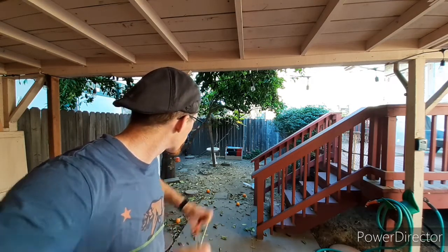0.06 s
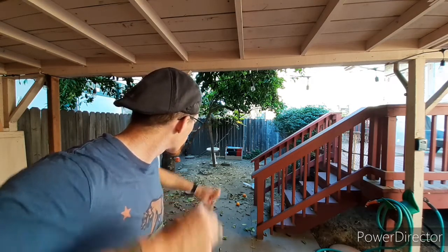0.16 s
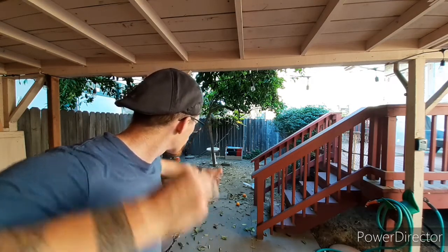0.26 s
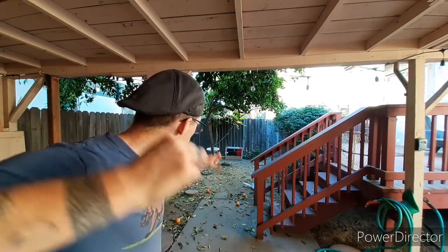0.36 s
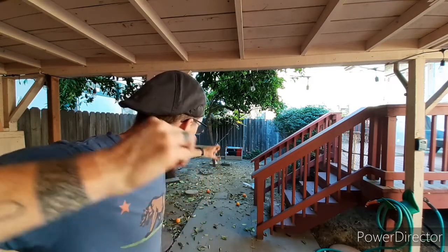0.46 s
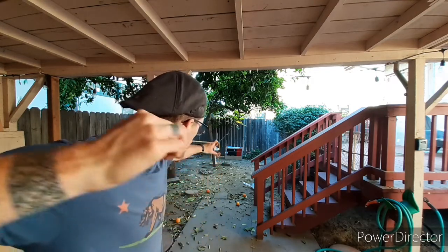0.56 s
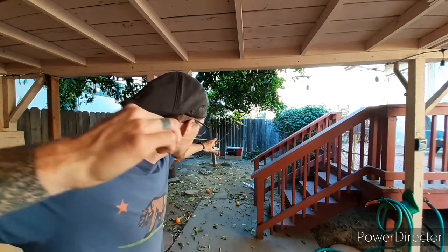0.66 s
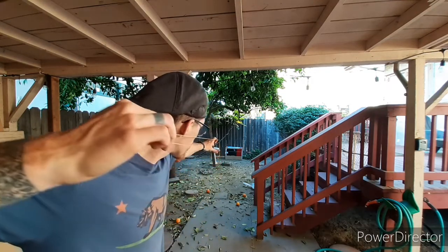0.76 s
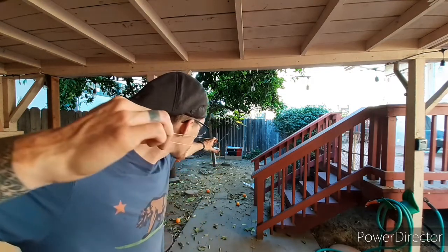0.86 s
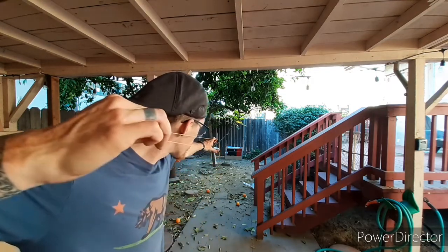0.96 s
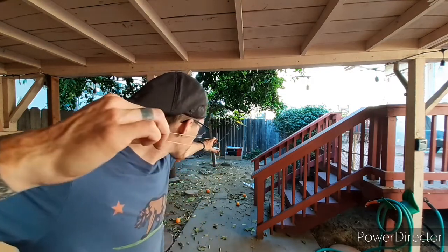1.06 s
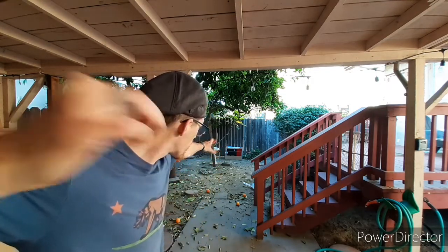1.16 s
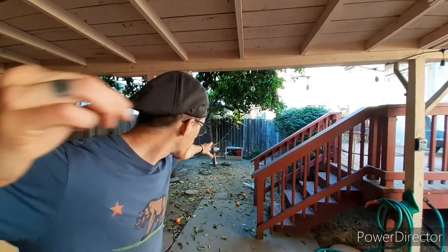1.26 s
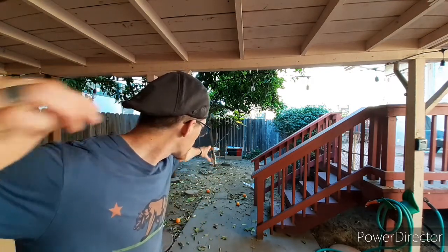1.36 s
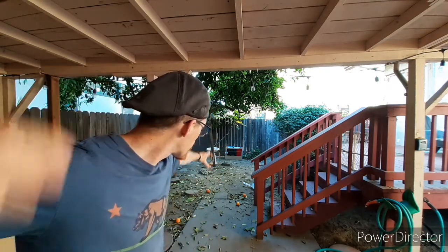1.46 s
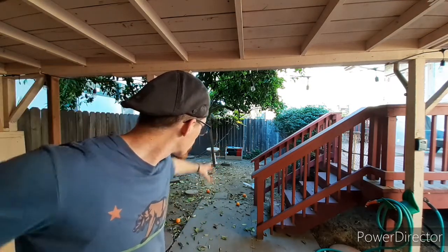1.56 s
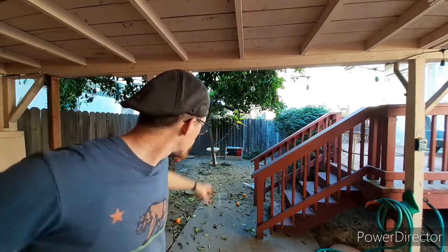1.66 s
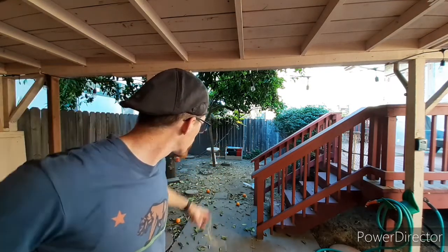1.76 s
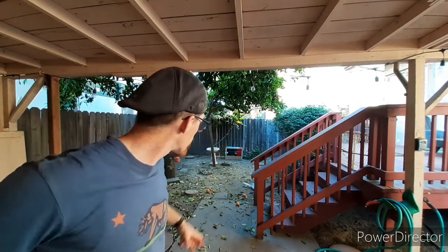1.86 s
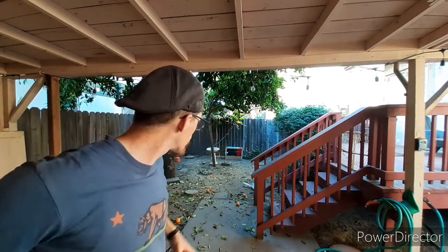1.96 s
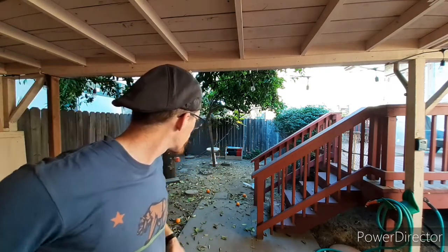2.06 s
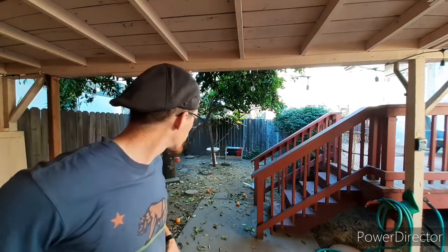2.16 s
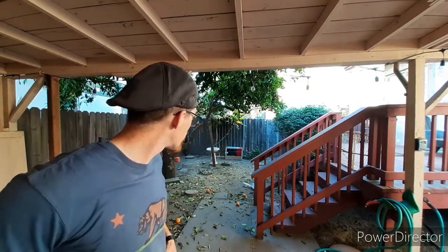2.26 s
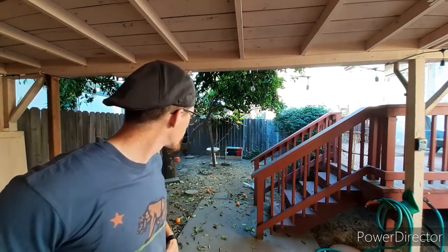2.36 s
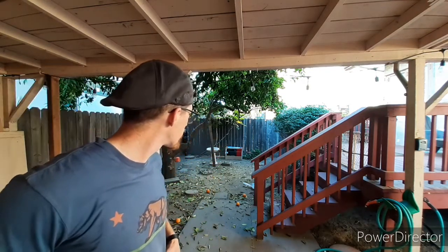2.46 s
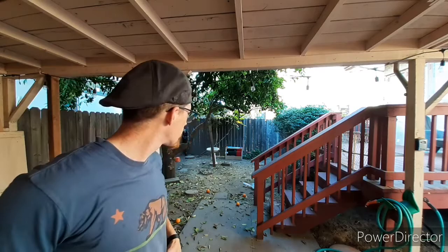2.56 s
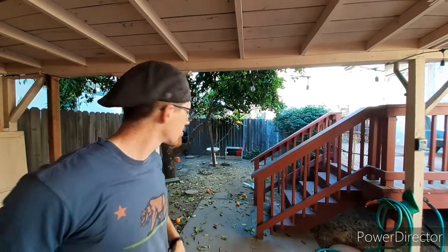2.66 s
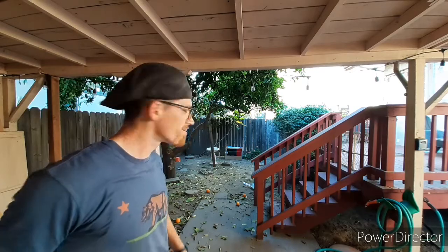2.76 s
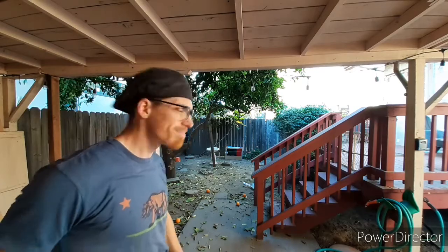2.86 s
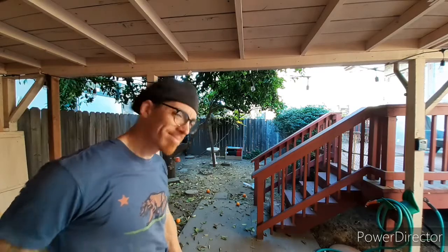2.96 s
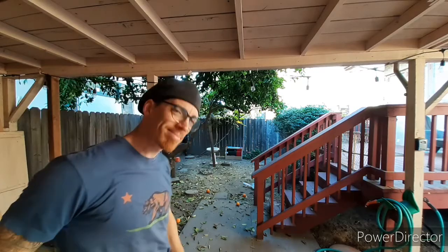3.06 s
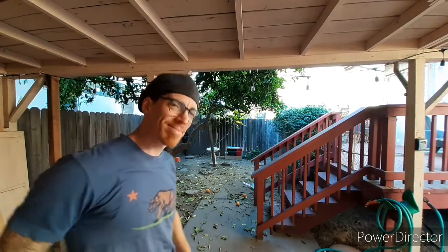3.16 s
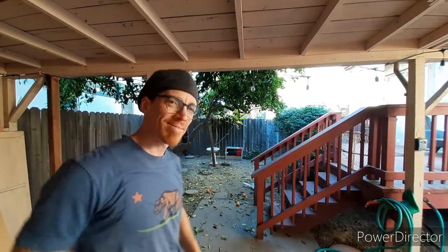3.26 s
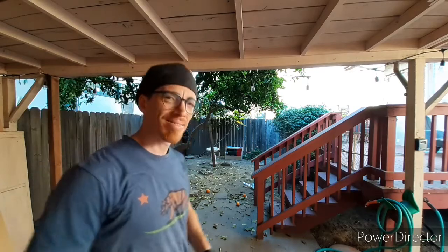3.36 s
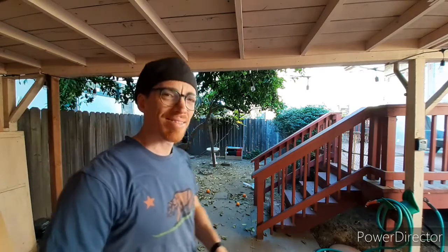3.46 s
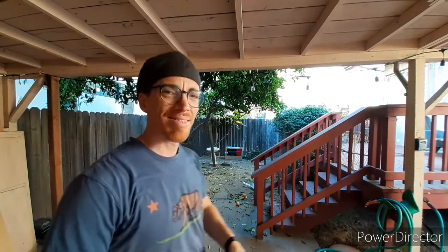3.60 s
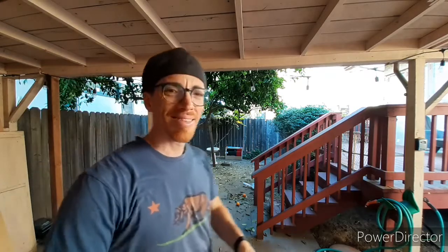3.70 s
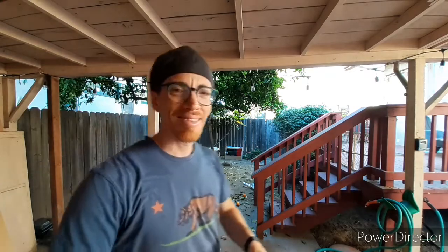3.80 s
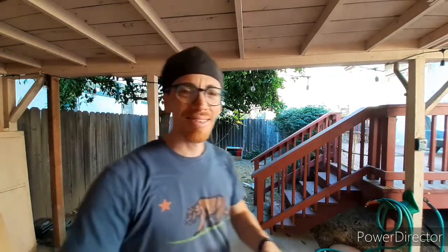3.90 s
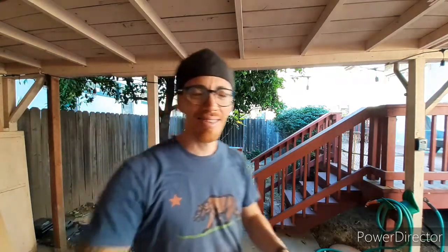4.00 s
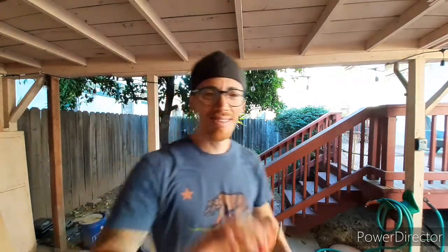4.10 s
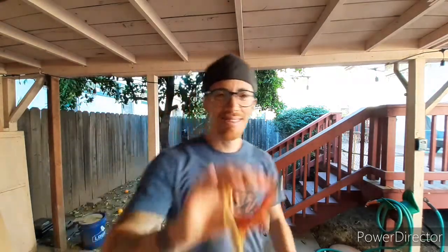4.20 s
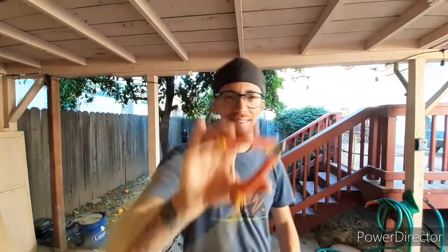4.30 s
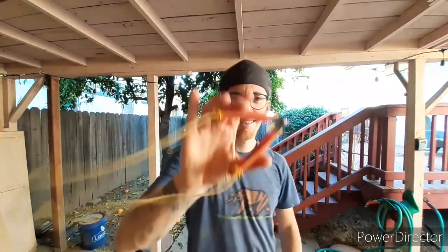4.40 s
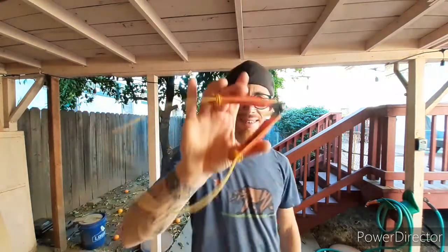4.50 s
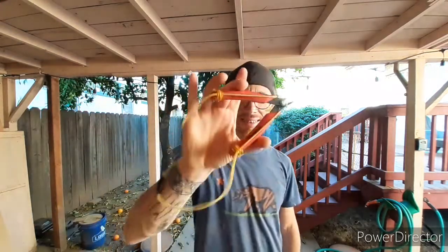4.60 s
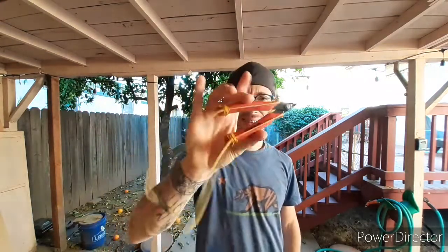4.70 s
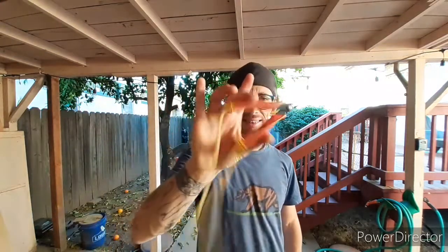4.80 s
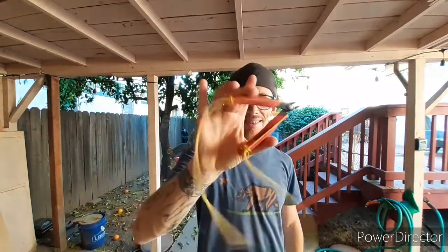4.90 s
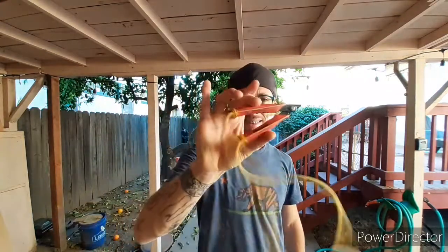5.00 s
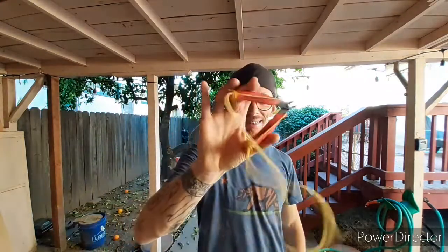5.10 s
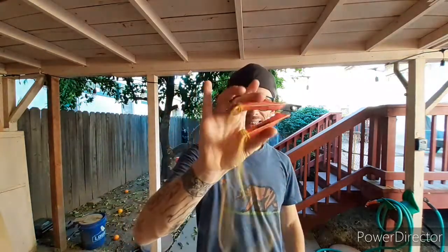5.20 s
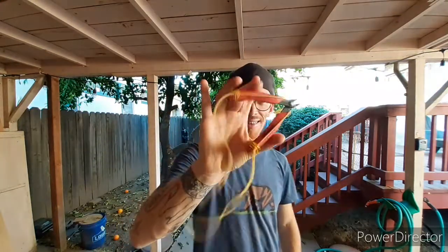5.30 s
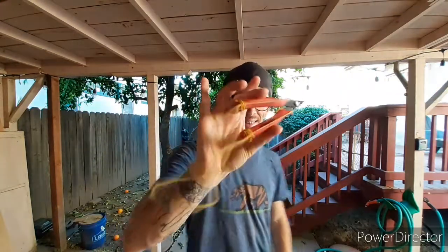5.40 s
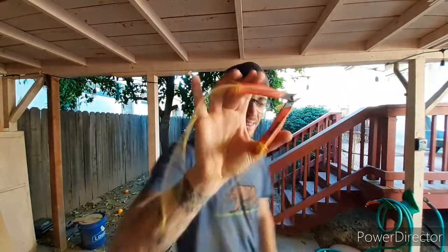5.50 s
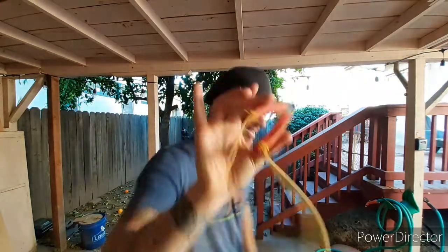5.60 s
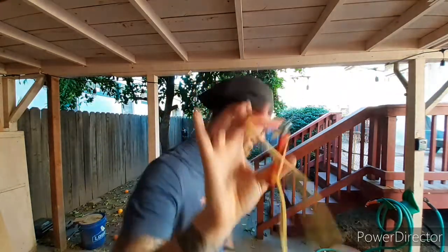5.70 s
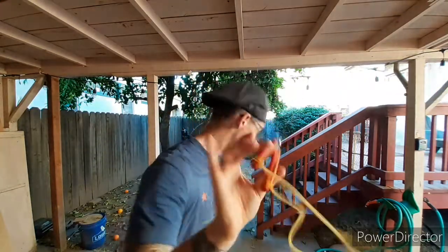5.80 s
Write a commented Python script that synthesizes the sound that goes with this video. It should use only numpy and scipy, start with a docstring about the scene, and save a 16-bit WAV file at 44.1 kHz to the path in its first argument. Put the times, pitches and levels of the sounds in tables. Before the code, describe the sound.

Under a wooden porch roof, low distant traffic and a faint motor hum precede a quick rubber-band whip and bright slaps close by. Almost at once the shot cracks loudly on a hollow bin down the yard, the sound washing back from fences. Several duller bounces follow, then soft cloth and shoe rustles and small ticks near a stereo microphone.

```python
"""Distant traffic and a machine's hum: drifting shaped noise and wavering sine orders.
Under a wooden porch roof a small slingshot whips and flaps: grainy noise and short slaps, with sparse echoes.
The shot cracks on a hollow bin down the yard and bounces a few times: noise bursts, decaying modes, and
noise washing back off fences and walls. Then cloth and soles rustle nearby: noise strokes, thuds and a squeak."""
import sys
import numpy as np
from scipy import signal
from scipy.io import wavfile
from scipy.ndimage import uniform_filter1d

SR = 44100
rng = np.random.default_rng(int(sys.argv[2]) if len(sys.argv) > 2 else 0)


def digitize_waveform(pressure):
    """Quantize a signal to 16-bit integers and store it at the path in sys.argv[1].

    Rows of a 2-D input are taken as channels; values are limited to [-1, 1].
    """
    field = np.atleast_2d(pressure).T
    bounded = np.clip(field, -1, 1)
    quanta = np.round(bounded * 32767).astype(np.int16)
    wavfile.write(sys.argv[1], SR, quanta)


def how_loud(loudness_db):
    """Turn decibels into a plain amplitude multiplier (0 dB gives 1, 20 dB gives 10)."""
    steps = np.asarray(loudness_db, float) / 20
    return 10 ** steps


N = 257940  # samples


def evened(x):
    """Scales to rms 1."""
    return x / np.sqrt(np.mean(x ** 2) + 1e-20)


def read(points, hz):
    """Looks up a table on a log-frequency axis."""
    f, value = np.transpose(points)
    return np.interp(np.log(hz + 1), np.log(f + 1), value)


def add(mix, start_s, sound):
    """Mixes a stereo sound in at start_s, cut at the end of the mix."""
    part = mix[:, round(start_s * SR):][:, :sound.shape[1]]
    part += sound[:, :part.shape[1]]


# sound from all around: (frequency [Hz], left-right likeness [0-1])
AROUND_LIKENESS = [(60, .97), (200, .96), (310, .86), (450, .5), (650, .14), (1400, .02), (15000, .02)]


def diffuse(count, size, shape_db, patchy_db, likeness=AROUND_LIKENESS, ripple_db=0):
    """Stereo noise from random short-time spectra; shape_db(hz, t) gives the level of every cell."""
    frames, hz = 4 * count // size + 5, np.fft.rfftfreq(size, 1 / SR)[:, None]
    a, b, c, d, patches = rng.standard_normal((frames, len(hz), 5)).T
    ripple = patches[:, :1]  # narrow peaks that stay put, as many small resonances give
    patches = uniform_filter1d(patches, size=8, axis=0)
    patches = evened(uniform_filter1d(patches, size=8, axis=1))
    same = np.clip(read(likeness, hz), -1, 1)
    left = a + 1j * b
    right = same * left + np.sqrt(1 - same ** 2) * (c + 1j * d)
    level_db = shape_db(hz, np.arange(frames) * size / 4 / SR) + patchy_db * patches + ripple_db * ripple
    cells = np.array([left, right]) * how_loud(level_db)
    return signal.istft(cells, nperseg=size, noverlap=3 * size // 4)[1][:, :count]


def humps(modes, hz):
    """Level in dB of a set of resonances, summed in power."""
    return 10 * np.log10(sum(how_loud(2 * db) / (1 + (2 * (hz - f) / width) ** 4) for f, width, db in modes))


def grainy(x, spread_db):
    """Many tiny slips of uneven size roughen a noise; rms 1."""
    slips = how_loud(spread_db * np.minimum(rng.exponential(1, x.shape[1]), 5))
    return evened(x * uniform_filter1d(slips, size=24))


def stroke(rise_s, hold_s, swell, fade_db_per_s):
    """Gain of one gesture: swells as a power of time, holds, then dies exponentially."""
    t = np.arange(0, rise_s + hold_s + 50 / fade_db_per_s, 1 / SR)  # until 50 dB down
    return np.minimum(t / rise_s, 1) ** swell * how_loud(-fade_db_per_s * np.maximum(t - rise_s - hold_s, 0))


def echoes(x, t60_s, level_db):
    """Adds sparse reflections of random sign off roof, posts and floor."""
    count = SR // 2
    taps = np.zeros((2, count))
    slots = np.arange(100, count - 20, 20)
    at = slots + rng.integers(0, 20, (2, len(slots)))
    np.put_along_axis(taps, at, rng.choice([-1., 1.], at.shape), axis=1)
    taps *= how_loud(-60 * np.arange(count) / SR / t60_s)
    reflected = signal.oaconvolve(x, taps / np.linalg.norm(taps[0]), axes=1)[:, :N]
    return x + how_loud(level_db) * reflected


def snaps(rows, spread):
    """Short decaying noise bursts; band edges lie a factor of spread either side of the centre."""
    out, t = np.zeros((2, N)), np.arange(200) / SR
    for start_s, peak_db, hz, pan_db in rows:
        band = signal.butter(2, [hz / spread, min(spread * hz, 20000)], "bandpass", fs=SR)
        snap = signal.lfilter(*band, rng.standard_normal((2, len(t))))
        snap *= np.exp(-t / (.0006 + 2 / hz))
        pan = how_loud([[pan_db / 2], [-pan_db / 2]])
        add(out, start_s, how_loud(peak_db) * pan * snap / abs(snap).max())
    return out


# air rush of the released bands: (frequency [Hz], density [dB per Hz])
WHIP_COLOUR = [(59, -41), (100, -2.5), (676, -8.5), (768, -4.5), (950, -9.5), (1200, -4), (1800, -6),
               (3940, -5), (7450, -18), (8280, -5), (13200, -4.5), (16000, -15)]
WHIP_START_S, WHIP_RISE_S, WHIP_HOLD_S, WHIP_DB = 1.2129, 0.0314, 0.0467, -22.5
WHIP_SWELL, WHIP_FADE_DB_PER_S = 2.7, 519.5
# slaps of bands and pouch: (time [s], peak before pan [dB], centre [Hz], left-right [dB])
SLAPS = [(1.2177, -25.5, 13000, 0), (1.2266, -25, 1002, 3.5), (1.2394, -8, 5000, -2.5),
         (1.2445, -16, 12010, 0), (1.2665, -14, 11030, 0.5), (1.273, -10.5, 6000, -0.5),
         (1.291, -17.5, 8000, -3)]
# small ticks of the tool in the hand: (time [s], peak before pan [dB], centre [Hz], left-right [dB])
TICKS = [(2.4, -48, 12000, 3), (2.443, -45, 11360, -3), (2.831, -59.5, 9000, 10), (2.853, -62, 11000, 5),
         (3.4498, -52, 8960, 7.0), (5.0394, -57.5, 8450, 5.5), (5.115, -62, 9500, 3), (5.255, -60, 8650, 4),
         (5.3083, -57, 8550, 3), (5.459, -53, 9300, 2.0), (5.6507, -36, 8700, 1), (5.816, -42, 8800, 1.5),
         (5.8414, -37, 10000, -1.5)]


def slingshot():
    """Rubber rushing through air as grainy noise, slaps and ticks of loose parts, all echoed by the porch."""
    speed = stroke(WHIP_RISE_S, WHIP_HOLD_S, WHIP_SWELL, WHIP_FADE_DB_PER_S)
    rush = diffuse(len(speed), size=512, shape_db=lambda hz, t: read(WHIP_COLOUR, hz), patchy_db=0.5)
    out = snaps(SLAPS, spread=2.2) + snaps(TICKS, spread=1.2)
    add(out, WHIP_START_S, how_loud(WHIP_DB) * speed * grainy(rush, 6.5))
    return echoes(out, t60_s=0.4, level_db=-7.0)


# fast blow: (frequency [Hz], density [dB per Hz])
HARD = [(70, -44), (120, -23), (185, -10.5), (320, -17), (700, -17.5), (1040, -4), (1300, -6), (1950, -3),
        (2600, -6), (3400, -3.5), (4100, -1.5), (4800, -8.5), (6400, -9.5), (9000, -8.5), (13000, -10.5),
        (16000, -18.5)]
# slow blow: (frequency [Hz], density [dB per Hz])
SOFT = [(71, -36.5), (120, -15), (569, -6.5), (656, -10.5), (1010, -1), (1290, -7.5), (1620, 2.5),
        (7050, -12), (9990, -9.5), (14700, -16), (16000, -46)]
# sound from down the yard: (frequency [Hz], left-right likeness [0-1])
YARD_LIKENESS = [(60, .95), (200, .95), (330, .85), (640, .45), (1400, .16), (3100, .08), (15000, .15)]
CRACK_OVER_DB, CRACK_DULLED_DB = 19.5, -15  # peak over the wash level; change at full dullness


def crack(wash_db, dull, colour):
    """The direct blow: a very short noise burst that keeps its treble."""
    t = np.arange(300) / SR
    brighter = lambda hz, u: colour(hz) + 1.5 * np.log2(hz + 100)
    burst = diffuse(len(t), size=256, shape_db=brighter, patchy_db=2.0, likeness=YARD_LIKENESS)
    burst *= np.exp(-(t / .0027) ** 3)
    return how_loud(wash_db + CRACK_OVER_DB + CRACK_DULLED_DB * dull) * burst / abs(burst).max()


# yard decay for a sharp blow: (frequency [Hz], t60 [s])
YARD = [(150, 0.53), (400, .5), (1000, 0.4), (2000, 0.36), (2900, 0.41), (4000, 0.43), (5200, 0.35),
        (8500, 0.37), (14000, 0.28)]
# wooden body: (frequency [Hz], width [Hz], level [dB])
WOOD = [(295.2, 210, -3.5), (570, 130, -1.5), (750, 52, 1), (1150, 300, -3)]
BUILD_MS, WOOD_BUILD_MS = 1.2, 13  # time constants of the fill-in
LAZY_MS_PER_DB, FIRM_DB = 0.33, -32  # blows weaker than a firm one fill in more slowly
DULL_SHORTER = 0.34  # share of the decay time that a fully dull blow loses
LINGER_DB, LINGER_DULL_DB, LINGER_LONGER = -31, 12, 2.6  # slower tail: level, rise at full dullness, t60 factor


def yard_wash(t, wash_db, dull, wood_db, colour):
    """Noise sent back by the yard: fills in, holds, then dies by band, with a slower tail and a wooden body."""
    near_db = lambda hz, u: -60 * (np.hypot(u, .04) - .04) / read(YARD, hz)  # holds before it falls

    def fall_db(hz, u):
        """Power sum of the main decay and the slower tail."""
        main_db = near_db(hz, u) / (1 - DULL_SHORTER * dull)
        tail_db = LINGER_DB + LINGER_DULL_DB * dull + near_db(hz, u) / LINGER_LONGER
        return 10 * np.log10(how_loud(2 * main_db) + how_loud(2 * tail_db))

    build_ms = BUILD_MS + LAZY_MS_PER_DB * max(FIRM_DB - wash_db, 0)
    wood = lambda hz: humps(WOOD, hz)
    wash = 0
    for level_db, tone, ms in ((wash_db, colour, build_ms), (wood_db, wood, WOOD_BUILD_MS)):
        dying = lambda hz, u: tone(hz) + fall_db(hz, u)
        part = diffuse(len(t), size=1024, shape_db=dying, patchy_db=1.8, likeness=YARD_LIKENESS, ripple_db=1.8)
        rise = 1 - np.exp(-1000 * t / ms)
        wash = wash + how_loud(level_db) * rise * part / np.std(part[:, :1500])
    single = grainy(np.ones((1, len(t))), 1.8)  # early on, single reflections stand out
    return wash * (1 + (single - 1) * np.exp(-t / .06))


# bin modes for a sharp blow: (frequency [Hz], level [dB], t60 [s])
BIN = [(183.7, -1, 0.69), (199.7, -10, 0.91), (1034, -1.5, 0.31), (1120, -20, 0.71), (1290, -10, .3),
       (1561, -6.5, 0.083), (1950, -9.5, .23), (3400, -8, .35), (3690, -7.5, 0.49), (4100, -13, 0.33),
       (4320, -13, 0.3)]


def bin_ring(t, dull, ring_db):
    """Decaying modes of the hollow bin; slow blows hardly wake the high ones and are damped sooner."""
    ring = 0
    for hz, db, t60_s in BIN:
        dulled_db = 2.6 * dull * np.log2(hz / BIN[0][0])
        fall_db = 60 * t / t60_s / (1 - .75 * dull)
        # high modes reach the two ports with unrelated phase, low ones nearly together
        turns = hz * t + hz / 1000 * rng.random((2, 1))
        ring = ring + how_loud(db - dulled_db - fall_db) * np.sin(2 * np.pi * turns)
    return how_loud(ring_db) * ring * (1 - np.exp(-t / 0.0046))


# shot striking and bouncing: (time [s], wash [dB], dullness [0-1], wooden body [dB], bin ring [dB])
KNOCKS = [(1.3524, -17, 0.02, -43, -28), (1.6855, -40.5, 0.77, -43, -36.5), (1.771, -32, 1, -36.5, -51),
          (2.0359, -49, 0.99, -46.5, -36.5), (2.0939, -36.5, 1, -44, -57),
          (2.1157, -31.5, 0.53, -31, -32.5), (2.452, -66, 0.55, -54, -58)]


def knocks():
    """Each impact joins a short crack, the ringing bin and the yard's wash; dull blows take the soft spectrum."""
    out, t = np.zeros((2, N)), np.arange(0, .75, 1 / SR)
    for start_s, wash_db, dull, wood_db, ring_db in KNOCKS:
        colour = lambda hz: (1 - dull) * read(HARD, hz) + dull * read(SOFT, hz)
        knock = yard_wash(t, wash_db, dull, wood_db, colour) + bin_ring(t, dull, ring_db)
        add(knock, 0, crack(wash_db, dull, colour))
        add(out, start_s, knock)
    return out


# treble of rubbing: (frequency [Hz], density [dB per Hz])
RUB = [(3820, -15), (6500, -10), (7610, -8.5), (8430, -1.5), (9690, -5.5), (11400, -5.5), (15000, -12.5),
       (15600, -19), (16000, -53)]
# middle resonances: (frequency [Hz], width [Hz], level [dB])
RUB_BODY = [(880, 1800, 4), (1700, 370, 6), (2880, 1840, 6), (5440, 2100, -3.5)]
# one row a stroke: (start [s], rise [s], hold [s], treble [dB], middle against treble [dB])
RUBS = [(2.201, 0.056, 0.16, -64.5, -2), (2.438, 0.028, 0.041, -72, 14), (2.729, .08, .02, -81, 2),
        (2.822, .012, .04, -72.5, -4), (2.859, 0.079, 0.18, -64.5, 4.5), (3.091, .088, 0.017, -47.5, -1.5),
        (3.181, 0.036, 0.062, -53, 3.5), (3.228, 0.076, 0.014, -56, 11), (3.4, .08, .25, -72, 1.5),
        (3.439, 0.011, 0.029, -69.5, -1.5), (3.7, 0.082, 0.24, -83, -2), (4.016, .045, .01, -50, 7.5),
        (4.199, 0.12, .06, -59.5, 7), (4.391, .135, 0.0047, -55, 4.5), (4.6, .08, 0.39, -85, 0),
        (5.03, .012, .2, -82, 5), (5.269, 0.042, .02, -70, 2), (5.303, 0.032, 0.1, -69, 7),
        (5.4, 0.075, 0.062, -63.5, 2.5), (5.529, 0.053, .03, -65, 1), (5.599, 0.033, .01, -61, 5.5),
        (5.66, .02, .18, -71, 7)]
RUB_SWELL, RUB_FADE_DB_PER_S = 1.55, 195


def rubs():
    """Cloth and soles: rubbing surfaces give a grainy hiss and a lower resonant scrape."""
    out = np.zeros((2, N))
    for start_s, rise_s, hold_s, treble_db, middle_db in RUBS:
        force = stroke(rise_s, hold_s, RUB_SWELL, RUB_FADE_DB_PER_S)
        hiss = diffuse(len(force), size=512, shape_db=lambda hz, t: read(RUB, hz), patchy_db=1.0)
        scrape = diffuse(len(force), size=512, shape_db=lambda hz, t: humps(RUB_BODY, hz), patchy_db=1.5)
        rub = grainy(evened(hiss) + how_loud(middle_db) * evened(scrape), 1.7)
        rub *= np.sqrt(1 + how_loud(2 * middle_db))  # grainy() evens the sum; this restores the treble level
        add(out, start_s, how_loud(treble_db) * force * rub)
    return out


# low ground resonances: (frequency [Hz], width [Hz], level [dB])
GROUND = [(80.5, 15, -4.5), (131, 8.9, 0.5), (300.5, 190, -9), (607, 150, -18)]
# weight shifts: (start [s], rise [s], hold [s], level [dB])
THUDS = [(2.99, 0.083, 0.05, -41), (5.661, 0.09, .01, -46)]
THUD_SWELL, THUD_FADE_DB_PER_S = 3, 171


def thuds():
    """Weight shifting on the ground: swelling noise through low resonances."""
    out = np.zeros((2, N))
    for start_s, rise_s, hold_s, db in THUDS:
        force = stroke(rise_s, hold_s, THUD_SWELL, THUD_FADE_DB_PER_S)
        thud = diffuse(len(force), size=2048, shape_db=lambda hz, t: humps(GROUND, hz), patchy_db=5.5)
        add(out, start_s, how_loud(db) * force * evened(thud))
    return out


# faint sole squeak: (start [s], length [s], mean pitch [Hz], levels of two partials before fades [dB rms])
SQUEAK = (4.03, 0.068, 1700, [-58, -57])


def squeak():
    """Quick uneven slips of a rubber sole give a short, blurred pitch."""
    start_s, length_s, hz, levels_db = SQUEAK
    count = round(length_s * SR)
    blur = evened(uniform_filter1d(rng.standard_normal(count), size=200))
    turns = np.cumsum(hz * (1 + 0.0263 * blur)) / SR
    tone = sum(np.sqrt(2) * how_loud(db) * np.sin(2 * np.pi * k * turns) for k, db in enumerate(levels_db, 1))
    out = np.zeros((2, N))
    add(out, start_s, np.array([tone, tone]) * signal.windows.tukey(count, .5))
    return out


HUM_HZ = 58.4  # mean speed
# steady orders: (multiple of HUM_HZ, level [dB rms])
HUM = [(3, -63.5), (4, -54), (5, -64.5), (6, -71.5), (8, -69)]
# second order, swelling and fading: (time [s], level [dB rms])
HUM_SECOND = [(0.0, -50), (0.37, -47), (1.05, -58.5), (1.3, -53), (1.8, -62), (2.7, -84), (3.8, -62),
              (4.1, -52.5), (4.35, -55), (4.6, -68), (5.3, -55.5), (5.85, -60)]


def hum():
    """Orders of a slightly unsteady motor, each wavering in strength."""
    t = np.arange(N) / SR

    def waver():
        """Slow random drift, rms 1."""
        smooth = uniform_filter1d(rng.standard_normal(N), size=4000)
        return evened(uniform_filter1d(smooth, size=4000))

    turns = np.cumsum(HUM_HZ + .15 * waver()) / SR
    out = np.zeros(N)
    for k, db in HUM + [(2, np.interp(t, *np.transpose(HUM_SECOND)))]:
        out += np.sqrt(2) * how_loud(db + .9 * waver()) * np.sin(2 * np.pi * (k * turns + rng.random()))
    return out


# rumble: (frequency [Hz], density [dB per Hz])
TOWN = [(15, -45), (25, -34), (64, 2.5), (185, -6), (236, -5), (373, -10), (988, -12.5), (1740, -22.5),
        (1890, -20.5), (2050, -24), (4250, -42.5), (7110, -52.5), (8360, -46), (14400, -48.5), (15600, -52),
        (16000, -63.5)]
# slow drift: (time [s], level [dB rms])
TOWN_LEVEL = [(0.0, -48.5), (0.25, -47), (1.1, -49.5), (1.55, -52), (2.6, -52.5), (3.2, -48.5),
              (4.3, -50.5), (5.5, -50.5), (5.85, -46.5)]


def town():
    """Distant traffic: shaped diffuse noise, drifting slowly in level."""
    noise = evened(diffuse(N, size=2048, shape_db=lambda hz, t: read(TOWN, hz), patchy_db=2.0))
    return noise * how_loud(np.interp(np.arange(N) / SR, *np.transpose(TOWN_LEVEL)))


def scene():
    """All sources together."""
    return slingshot() + knocks() + rubs() + thuds() + squeak() + hum() + town()


def low_pass(x):
    """Removes everything above the highest recorded frequency."""
    return signal.sosfilt(signal.butter(12, 16640, fs=SR, output="sos"), x)


LEFT_DB = 1.5  # the left port is more sensitive than the right
LOW_HZ, HIGH_HZ = 45.1, 16000  # microphone passband
CEILING = .8  # full swing of the input stage


def record(dry):
    """Microphone with unequal ports and band limits, into an input stage that squeezes the loudest peaks."""
    ports = dry * how_loud([[LEFT_DB / 2], [-LEFT_DB / 2]])
    ports = signal.sosfilt(signal.butter(4, LOW_HZ, "highpass", fs=SR, output="sos"), ports)
    ports = signal.oaconvolve(ports, signal.firwin(255, HIGH_HZ, fs=SR)[None], "same")
    squeezed = ports / (1 + (ports / CEILING) ** 4) ** (1 / 4)
    return low_pass(squeezed)


dry = scene()
out = record(dry)
digitize_waveform(out)
```